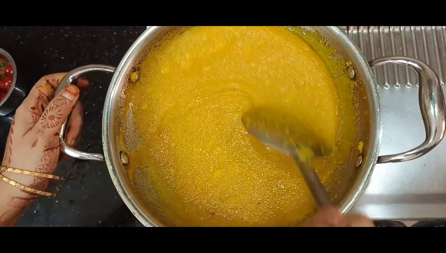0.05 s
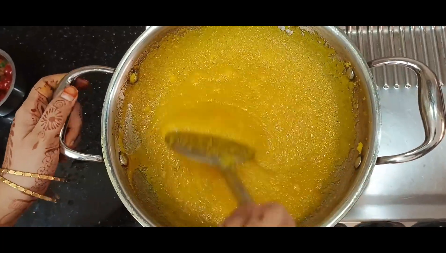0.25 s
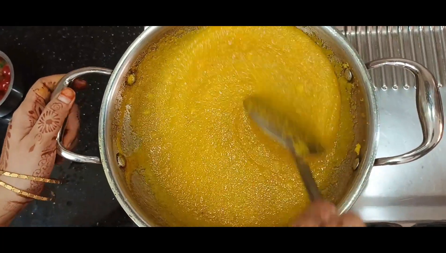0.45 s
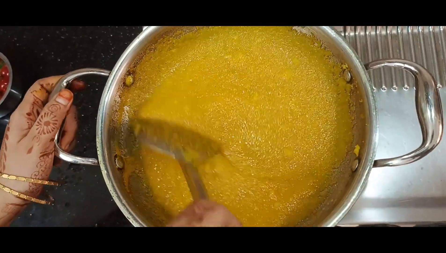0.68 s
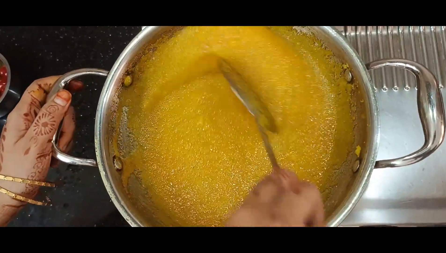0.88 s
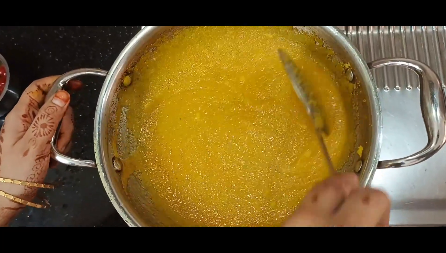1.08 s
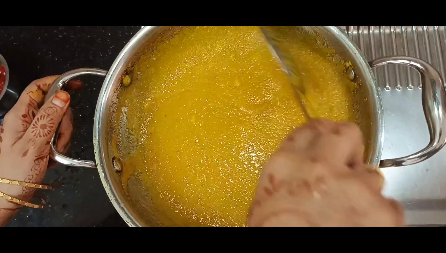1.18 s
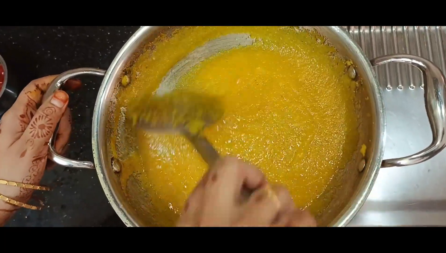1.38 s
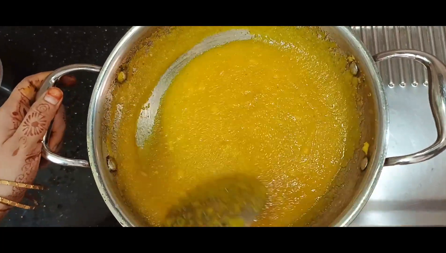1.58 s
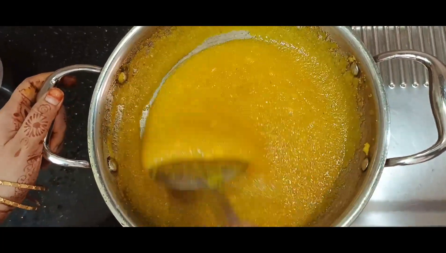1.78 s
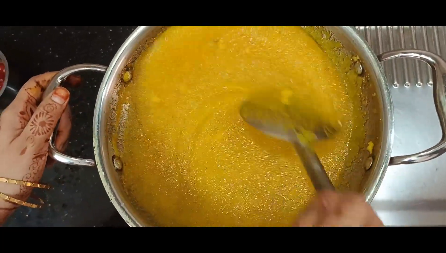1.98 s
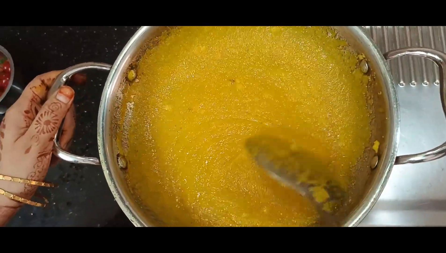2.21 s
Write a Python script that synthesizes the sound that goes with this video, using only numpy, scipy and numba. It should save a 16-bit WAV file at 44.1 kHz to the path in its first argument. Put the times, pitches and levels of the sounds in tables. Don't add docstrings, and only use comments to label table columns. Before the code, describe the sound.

Close, nearly mono pickup of a metal spoon stirring heavy paste in a damped steel pot: sharp clacks, rough scrapes, wet slumps, small bangle clinks between strokes, and a low fridge drone underneath.

```python
import sys
import numpy as np
from scipy import signal
from scipy.fft import rfft, irfft, next_fast_len
from scipy.io import wavfile
from scipy.ndimage import uniform_filter1d
from numba import njit

SR = 44100
rng = np.random.default_rng(int(sys.argv[2]) if len(sys.argv) > 2 else 0)


def transcribe(u):
    v = np.clip(np.atleast_2d(u).T, -1, 1)
    q = np.round(v * 32767).astype(np.int16)
    wavfile.write(sys.argv[1], SR, q)


def magnitude_from_level(level_db):
    exponent = np.asarray(level_db, float) / 20
    return 10 ** exponent


N = 99225
TILT_HZ = 4630


def curve(points, hz):
    p = np.array(points, float)
    return np.interp(np.log(np.maximum(hz, 1)), np.log(p[:, 0]), p[:, 1])


def colour(x, points, size=2048):
    log_gain = curve(points, np.arange(size // 2 + 1) * SR / size) * np.log(10) / 20
    cepstrum = irfft(log_gain)
    cepstrum[1:size // 2] *= 2
    cepstrum[size // 2 + 1:] = 0
    return signal.fftconvolve(x, irfft(np.exp(rfft(cepstrum))))[:N]


def decay(t, t60):
    return np.exp(-np.log(1000) * t / t60)


def ring(modes, scatter_db):
    t = np.arange(SR // 2) / SR
    out = np.zeros(len(t))
    for hz, db, t60 in modes:
        strength = magnitude_from_level(db + scatter_db * rng.standard_normal())
        out += strength * decay(t, t60) * np.cos(2 * np.pi * hz * t)
    return out


def unit(x):
    return x / np.sqrt(np.mean(x ** 2))


def walk(rate):
    k = int(SR / rate)
    steps = np.repeat(rng.standard_normal(N // k + 1), k)
    return unit(uniform_filter1d(uniform_filter1d(steps, k), k)[:N])


def tilt(x, bright_db, hz):
    low = signal.lfilter(*signal.butter(2, hz, "low", fs=SR), x)
    high = signal.lfilter(*signal.butter(2, hz, "high", fs=SR), x)
    return low - magnitude_from_level(bright_db) * high


@njit
def svf(x, hz, q):
    y, b, l, k = np.empty(len(x)), 0., 0., 1 / q
    for i in range(len(x)):
        g = np.tan(np.pi * hz[i] / SR)
        v = (b + g * (x[i] - l)) / (1 + g * (g + k))
        b, l, y[i] = 2 * v - b, l + 2 * g * v, k * v
    return y


def place(out, start_s, sound):
    i = int(start_s * SR)
    out[i:i + len(sound)] += sound


# frequency in Hz, level in dB.
AIR_SHAPE = [(25, -32), (55, -13), (130, -3), (250, -8.5), (600, -11), (1600, -11), (3000, -18.5),
             (6500, -24.5), (16000, -27.5)]


def kitchen():
    air_db, drone_db = -70.5, -83
    drone_hz, width_hz = 123, 78
    air = unit(colour(rng.standard_normal(N), AIR_SHAPE, size=8192)) * magnitude_from_level(air_db + 2.34 * walk(21))
    edges = [drone_hz - width_hz / 2, drone_hz + width_hz / 2]
    band = signal.butter(2, edges, "band", fs=SR, output="sos")
    drone = signal.sosfilt(band, rng.standard_normal(N))
    return air + unit(drone) * magnitude_from_level(drone_db + 2.9 * walk(9.8))


# time in seconds, pressure in dB, brightness in dB,
# tone of the hollow behind the spoon in Hz.
DRAG_A = [(0.0, -47.5, -22, 940), (0.008, -46, -11, 940), (0.024, -58.5, -12, 900),
          (0.038, -48.5, -14.5, 735), (0.14, -94, -4, 621)]
DRAG_B = [(0.25, -44.5, -26, 670), (0.28, -41.5, -20, 830), (0.377, -38.5, -8, 910), (0.402, -49, -5, 750),
          (0.418, -44, -7.5, 700), (0.546, -62.5, -24.5, 660), (0.6, -71, -17.5, 754)]
DRAG_C = [(0.665, -43, -23, 1044), (0.701, -43.5, -10.5, 1020), (0.722, -50, 1.5, 1050)]
DRAG_D = [(0.77, -44.5, -3, 646), (0.812, -53.5, 6.5, 690), (0.832, -51.5, 5.5, 690),
          (0.894, -60.5, -14, 720), (0.915, -54, -11.5, 730), (1.033, -86.5, 0, 650), (1.041, -73, -9, 690)]
DRAG_E = [(1.2, -45, -12, 925), (1.208, -48.5, -12.5, 930), (1.248, -50, -9.5, 993),
          (1.31, -54.5, 11.5, 850), (1.395, -43.5, -6.5, 983), (1.44, -50, -12.5, 750),
          (1.474, -60.5, -18, 711), (1.62, -91.5, -22, 968)]
DRAG_F = [(1.761, -47.5, -0.5, 787), (1.798, -51.5, 11, 1215), (1.815, -35, -9, 1240),
          (1.91, -38, -9, 1155), (1.986, -39.5, -18, 1290), (2.002, -52.5, -21, 1190),
          (2.061, -57.5, -5.5, 940), (2.173, -73.5, -29, 1220), (2.22, -90, -9, 1084)]
DRAG_START_S = [0, .2185, .6555, .7225, 1.169, 1.7375]
# hollow level in dB, spoon bowl in Hz, bowl lift in dB, spoon rim in Hz,
# rim lift in dB.
DRAG_VOICES = [(1, 1900, -0.8, 7000, -5), (-3, 3070, 2, 5800, .1), (-1.5, 1100, 1.5, 3600, -1),
               (2.5, 6100, -4.5, 5500, 3.1), (4.5, 3080, -8, 9500, 3.5), (-9.5, 2500, 1.5, 5200, 2.5)]


def drags():
    clicks_per_s, click_spread_db, chatter_db = 7000, -0.5, 1
    patch_db, below_hollow_db_per_oct = 2.18, 20.5
    t = np.arange(N) / SR
    level, bright, hollow = np.ones((3, N))
    for start, rows in zip(DRAG_START_S, [DRAG_A, DRAG_B, DRAG_C, DRAG_D, DRAG_E, DRAG_F]):
        time, pressure_db, bright_db, hollow_hz = np.array(rows, float).T
        on = t >= start
        fade_db = 300 * np.maximum(t - time[-1], 0)
        level[on] = magnitude_from_level(np.interp(t, time, pressure_db) - fade_db)[on]
        bright[on] = np.interp(t[on], time, bright_db)
        hollow[on] = np.interp(t[on], time, hollow_hz)

    clicks = rng.random(N) < clicks_per_s / SR
    sizes = magnitude_from_level(click_spread_db * rng.exponential(size=N))
    grit = unit(clicks * sizes * rng.standard_normal(N)) * magnitude_from_level(chatter_db * walk(90))

    rub = np.zeros(N)
    for k, hz in enumerate(350 * 2 ** np.arange(0, 5.6, .5)):
        patch = svf(grit, hz * magnitude_from_level(0.45 * walk(13.79)), 3.51)
        octaves_below = np.maximum(np.log2(0.64 * hollow / hz), 0)
        gain_db = patch_db * walk(30.18) - below_hollow_db_per_oct * octaves_below
        rub += (-1) ** k * patch * magnitude_from_level(gain_db)

    drag_now = np.searchsorted(DRAG_START_S, t, "right") - 1
    hollow_db, bowl_hz, bowl_db, rim_hz, rim_db = np.array(DRAG_VOICES, float)[drag_now].T.copy()
    rub += magnitude_from_level(2.5 + hollow_db) * svf(grit, hollow, 11.0)
    rub = rub + (magnitude_from_level(bowl_db) - 1) * svf(rub, bowl_hz, 0.93)
    rub = rub + (magnitude_from_level(rim_db) - 1) * svf(rub, rim_hz, 2.8)
    return tilt(unit(rub) * level, np.clip(bright + 3.5, -15, 12), TILT_HZ)


# frequency in Hz, level in dB, 60 dB fade in seconds.
POT_MODES = [(489.4, 8.5, 0.033), (709.5, -2, 0.034), (773, -3, 0.069), (1044, -8, 0.097),
             (1394, -6, 0.017), (1603, -15, 0.033), (1928, -5.5, 0.078), (2120, -3, 0.052),
             (2290, -5, 0.044), (2450, 9, 0.008), (2870, 8.5, 0.022), (3430, 1.5, 0.016), (4550, 4, 0.024),
             (5700, -0.5, 0.0086)]
# frequency in Hz, level in dB.
FLOOR_SHAPE = [(100, -59), (250, -20.5), (430, -14.5), (750, -5.5), (1050, -3), (2500, -8), (6500, -11),
               (16000, -10.5)]


def pot(force):
    body = ring(POT_MODES, 0)
    body *= magnitude_from_level(-14) / np.sqrt(np.sum(body ** 2))
    body[0] += 1
    shape = colour(body, FLOOR_SHAPE)
    return signal.fftconvolve(force, shape / np.sqrt(np.sum(shape ** 2)) * 1.588)[:N]


# start in seconds, level in dB, pitch in Hz, 60 dB fade in seconds.
PASTE_SLUMPS = [
    (.005, -50.5, 304, 0.22),
    (0.221, -55, 342, 0.37),
    (.66, -58.5, 317, 0.32),
    (0.732, -53, 458, 0.69),
    (1.2, -63, 264, 0.49),
    (1.739, -54.5, 261, 0.44),
]


def slumps():
    out, t = np.zeros(N + SR), np.arange(SR // 2) / SR
    for s, db, hz, t60 in PASTE_SLUMPS:
        centre = hz + 0 * t
        thud = unit(svf(svf(rng.standard_normal(len(t)), centre, 1.94), centre, 1.94))
        place(out, s, magnitude_from_level(db) * thud * np.minimum(t / 0.0076, 1) * decay(t, t60))
    return out[:N]


# middle in seconds, level in dB, pitch in Hz, length in seconds.
STEAM_PLOPS = [(0.025, -80, 133, 0.015), (0.181, -73, 123, 0.057), (0.293, -72, 119, 0.019),
               (0.354, -75, 132, 0.038), (0.408, -73, 111, 0.037), (0.471, -70, 142, 0.046),
               (0.576, -68, 132, 0.062), (0.66, -72, 145, 0.012), (0.74, -67, 147, 0.0098),
               (0.809, -64.5, 131, 0.033), (0.888, -66, 132, 0.032), (0.995, -67.5, 128, 0.055),
               (1.077, -65.5, 130, 0.034), (1.143, -74, 142, 0.023), (1.225, -67.5, 116, 0.05),
               (1.375, -65, 105, 0.09), (1.433, -65.5, 133, 0.03), (1.501, -73, 118, 0.024),
               (1.613, -71, 131, 0.015), (1.667, -81, 121.6, 0.028), (1.729, -68.5, 119, 0.072),
               (1.843, -62, 123, 0.037), (1.912, -65, 121, 0.02), (1.972, -65, 115, 0.018),
               (2.091, -69, 123, 0.059), (2.168, -68, 106.6, 0.046), (2.234, -69, 131, 0.041)]


def plops():
    out, t = np.zeros(N), np.arange(N) / SR
    for s, db, hz, length in STEAM_PLOPS:
        on = slice(max(int((s - .2) * SR), 0), int((s + .2) * SR))
        u = t[on] - s
        swell = np.exp(-(u / (0.48 * length)) ** 2)
        glide = 1 + 0.16 * np.tanh(u / length) / 2
        out[on] += magnitude_from_level(db + 3) * swell * np.sin(2 * np.pi * hz * u * glide)
    return out


LANDING_START_S = [.0348, .2186, .5871, .6552, .7298, 1.1692, 1.5928, 1.7170, 1.7376]
# peak in dB, brightness in dB, rattle's 60 dB fade in seconds, knock in Hz, weight in dB.
SPOON_LANDINGS = [
    (-55.5, 5, 0.063, 610, -2),
    (-18, -7, 0.18, 1500, -11.5),
    (-68, 0, 0.015, 9500, -9),
    (-35.5, -24, 0.048, 1430, 1.5),
    (-21, 9, 0.047, 2810, -23),
    (-21.5, -5.5, 0.057, 1035, -4.5),
    (-82, 12.5, 0.019, 7300, -10),
    (-34, -16, 0.066, 2630, -36),
    (-28, 12, 0.038, 743, 1.5),
]
# frequency in Hz, level in dB, frequency in Hz, level in dB.
FURTHER_KNOCKS = [(2500, -6, 4300, -15), (3070, -5.5, 3650, -6), (9000, -9, 12000, -9), (3400, 8, 6000, -17),
                  (1920, -6, 13000, 15), (2080, 8.5, 3400, 3), (10000, -7, 13000, -9), (4230, 6, 2000, -18),
                  (3360, 12.5, 4300, 18)]


def landings():
    rattle_db, knock_db, knock_cycles = -8, 2, 2.1
    crack_s, rise_s, knock_late_s, weight_hz = .0012, 0.00066, 0.000527, 1300
    out, t = np.zeros(N + SR), np.arange(SR // 4) / SR
    late = np.maximum(t - knock_late_s, 0)
    for s, landing, upper in zip(LANDING_START_S, SPOON_LANDINGS, FURTHER_KNOCKS):
        db, bright_db, t60, hz, weight_db = landing
        hz2, db2, hz3, db3 = upper
        blow = magnitude_from_level(rattle_db) * rng.standard_normal(len(t)) * decay(t, t60)
        blow += 0.79 * rng.standard_normal(len(t)) * np.exp(-t / crack_s)
        blow *= np.minimum(t / rise_s, 1)
        blow[[24, 38, 66]] += [1.4, -2.6, 1.3]
        knock = np.zeros(len(t))
        for f, g in ((hz, 0), (hz2, db2), (hz3, db3)):
            fade = np.exp(-late * np.sqrt(f * 1000) / knock_cycles)
            knock += magnitude_from_level(knock_db) * 0.27 * magnitude_from_level(g) * np.sin(2 * np.pi * f * late) * fade
        blow = tilt(blow, bright_db, TILT_HZ)
        blow = magnitude_from_level(weight_db) * tilt(blow, -weight_db, weight_hz)
        place(out, s, magnitude_from_level(db) * (blow + knock))
    return out[:N]


# start in seconds, level in dB, upper ring in dB, lower ring in dB, tick in dB.
BANGLE_CLINKS = [
    (0.1706, -53.5, 9, -8, 14),
    (.6083, -59, 9, -8, 6),
    (1.0572, -51, -2.5, -9.5, 3),
    (1.069, -55, 0.5, 9, -6),
    (1.594, -100, 0, 4, 40),
]
# frequency in Hz, level in dB, 60 dB fade in seconds.
BANGLE_MODES = [(4878, -27, .12), (5861, -25, .2), (6470, -20, .1), (8701, -28, .15), (10190, -21, .12),
                (10885, -1, .055), (10905, -26, .28), (11961, -19, .1), (12901, -25, .05),
                (14620, -13, .05), (15191, -3, .05), (15230, -24, .18)]
# start in seconds, frequency in Hz, level in dB, 60 dB fade in seconds.
SINGLE_RING = (1.5405, 11959, -65, .09)


def bangles():
    out, t = np.zeros(N + SR), np.arange(SR // 2) / SR
    for s, db, upper_db, lower_db, tick_db in BANGLE_CLINKS:
        modes = []
        for hz, g, t60 in BANGLE_MODES:
            lift_db = 12 if hz > 7000 else lower_db
            modes.append((hz, g + upper_db * (hz > 11500) + lift_db, t60))
        clink = ring(modes, 3.7) * (1 - np.exp(-t / 0.0003))
        tick = np.diff(rng.standard_normal(len(t) + 4), 4)
        clink += 0.67 * magnitude_from_level(tick_db) * tick * np.exp(-t / .0012)
        place(out, s, magnitude_from_level(db) * clink)
    place(out, SINGLE_RING[0], ring([SINGLE_RING[1:]], 0))
    return out[:N] * magnitude_from_level(3.0 * walk(140))


# start in seconds, peak in dB, pitch in Hz.
EDGE_CATCHES = [(0.304, -27.5, 2550), (0.355, -29.5, 1450), (0.421, -31, 1670), (0.911, -47, 776),
                (1.397, -37, 1080), (1.77, -33, 4720), (1.804, -32, 1540), (1.84, -28.5, 1330),
                (1.884, -25.5, 2060), (1.905, -26, 2150), (1.961, -31, 1700), (2.074, -44.5, 1710)]


def catches():
    out, t = np.zeros(N + SR), np.arange(SR // 40) / SR
    for s, db, hz in EDGE_CATCHES:
        tick = np.sin(2 * np.pi * hz * t) + 0.69 * rng.standard_normal(len(t))
        place(out, s, magnitude_from_level(db - 6.5) * tick * np.exp(-t / 0.0024))
    return out[:N]


def spoon():
    t = np.arange(N) / SR
    rub = rng.standard_normal(N) * (t > 1.33) * (t < 1.56)
    handle = ring([(2290, 0, .3)], 0)
    return magnitude_from_level(-72.5) * unit(signal.fftconvolve(rub, handle)[:N]) * 0.28


def room(near):
    t = np.arange(SR // 2) / SR
    tail = rng.standard_normal(len(t)) * decay(t, 0.26) * (t > .003)
    tail = colour(tail, [(500, -14.5), (4000, -17.5), (12000, -20.5)])
    return signal.fftconvolve(near, tail * magnitude_from_level(-13.5) / np.sqrt(np.sum(tail ** 2)))[:N]


def scene():
    force = drags() + landings() + catches()
    near = pot(force) + bangles() + slumps() + spoon()
    mono = near + room(near) + kitchen() + plops()
    return np.array([mono, mono])


# frequency in Hz, level in dB.
PHONE_TREBLE = [(6400, -4), (7300, -14), (8300, -22), (9700, -5), (10600, -13.5), (13600, -22.5),
                (15400, -12.5), (15750, -42.5)]
# frequency in Hz, level in dB.
PORT_DIFFERENCE = [(3500, -55.5), (5500, -46), (6800, -15), (8300, -14.5), (9500, -6.5), (10500, -15),
                   (11400, -44), (13000, -63)]


def phone(dry):
    mid = colour(dry.mean(axis=0), PHONE_TREBLE)
    size = next_fast_len(2 * N)
    hz = np.arange(size // 2 + 1) * SR / size
    side = irfft(rfft(mid, size) * magnitude_from_level(curve(PORT_DIFFERENCE, hz)), size)[:N]
    return np.array([mid + side, mid - side])


def low_pass(x):
    return signal.sosfilt(signal.butter(12, 16850, fs=SR, output="sos"), x)


def record(dry):
    return low_pass(phone(dry))


dry = scene()
out = record(dry)
transcribe(out)
```